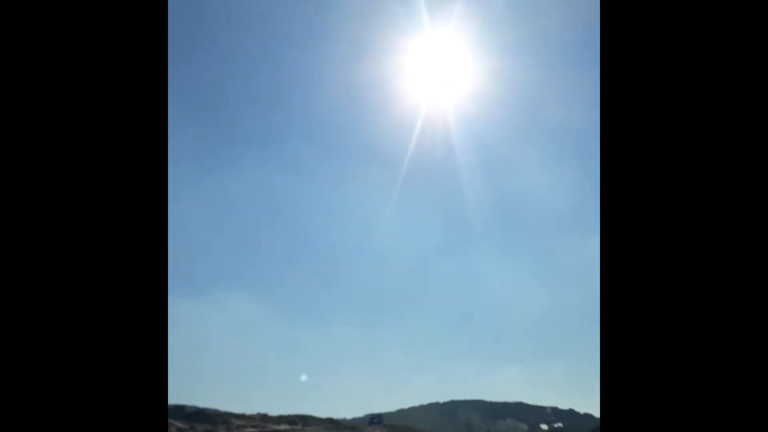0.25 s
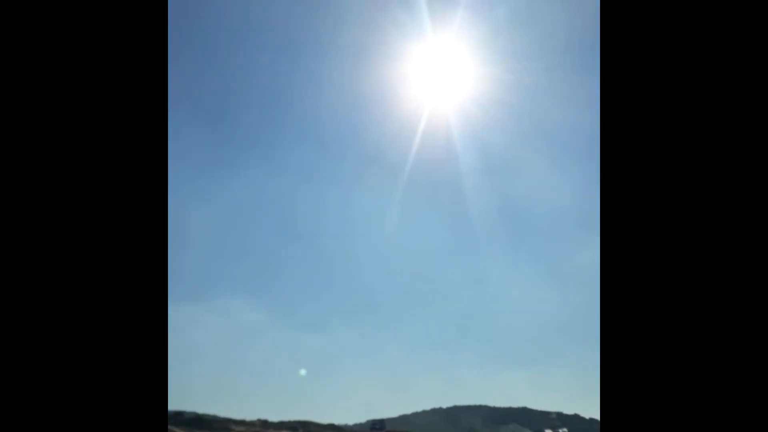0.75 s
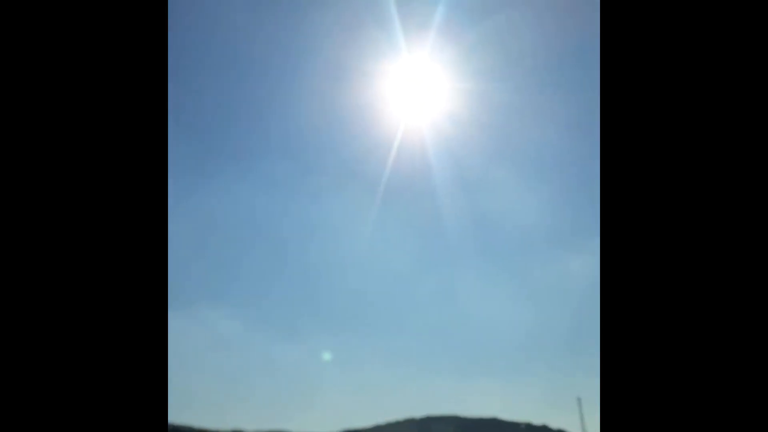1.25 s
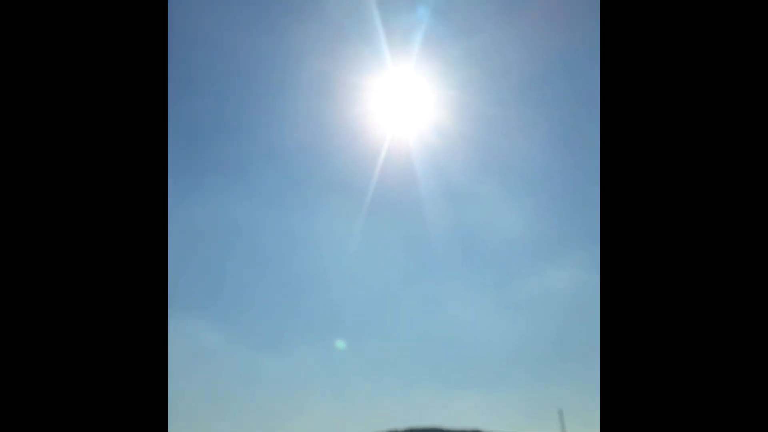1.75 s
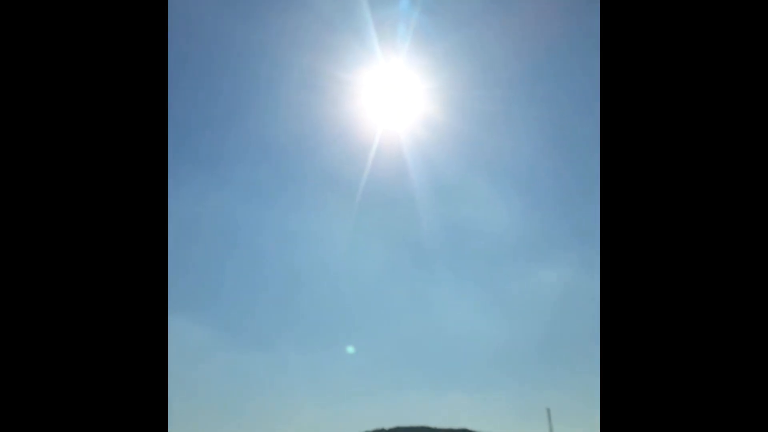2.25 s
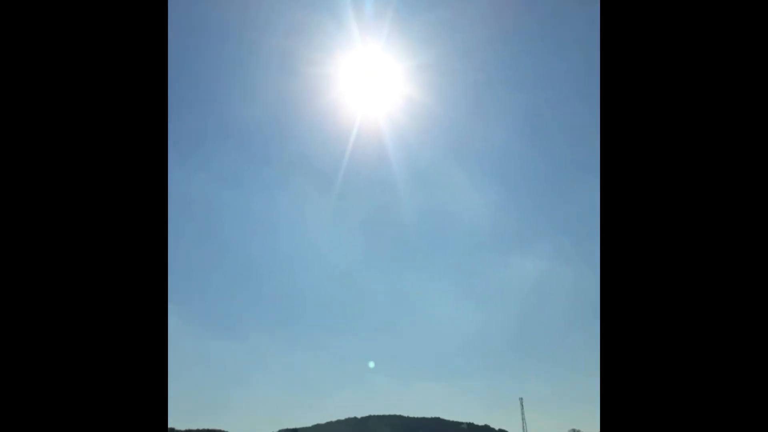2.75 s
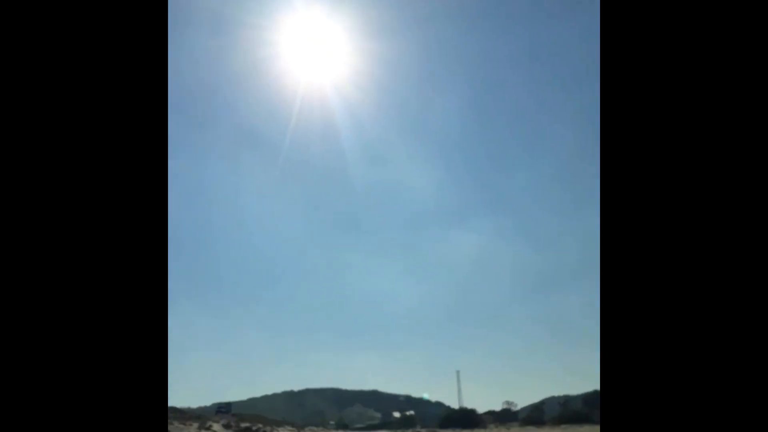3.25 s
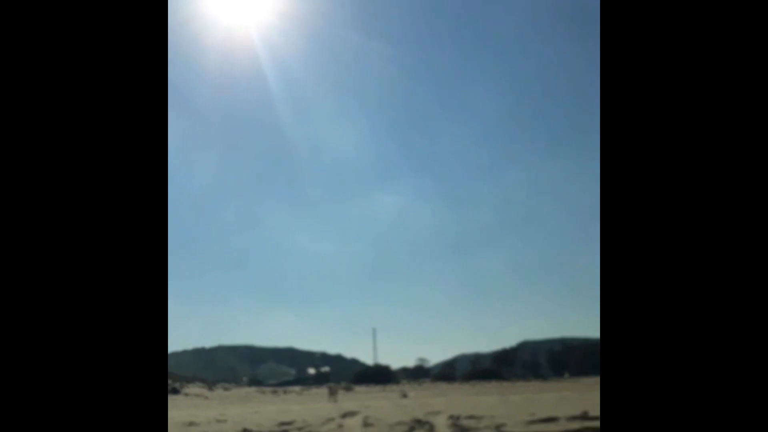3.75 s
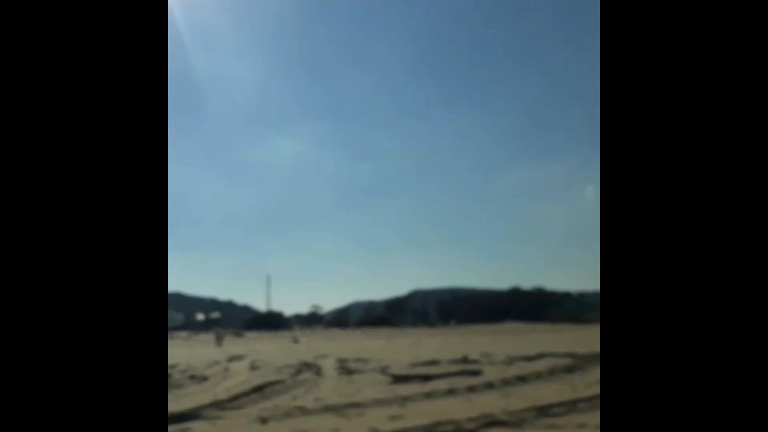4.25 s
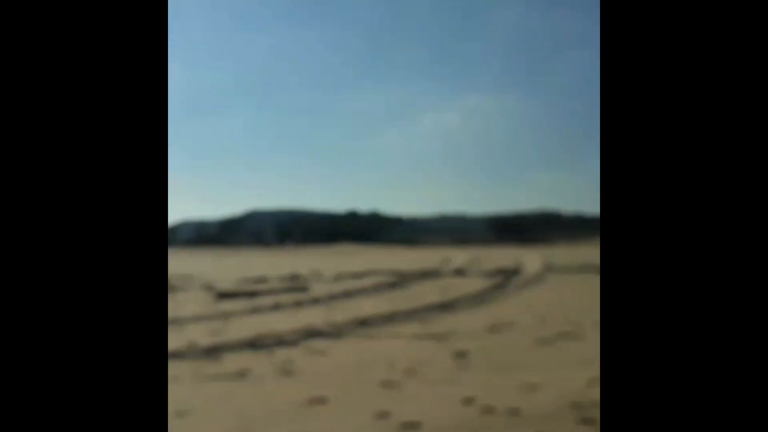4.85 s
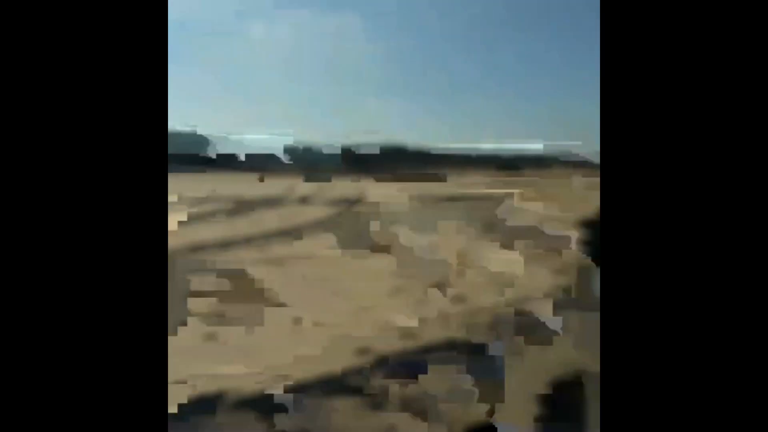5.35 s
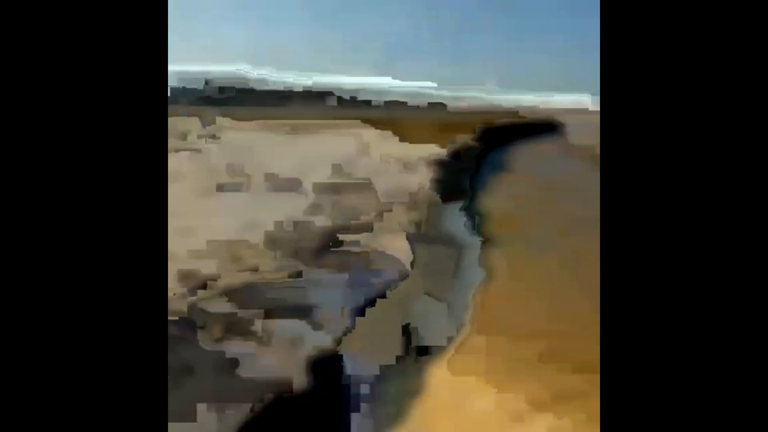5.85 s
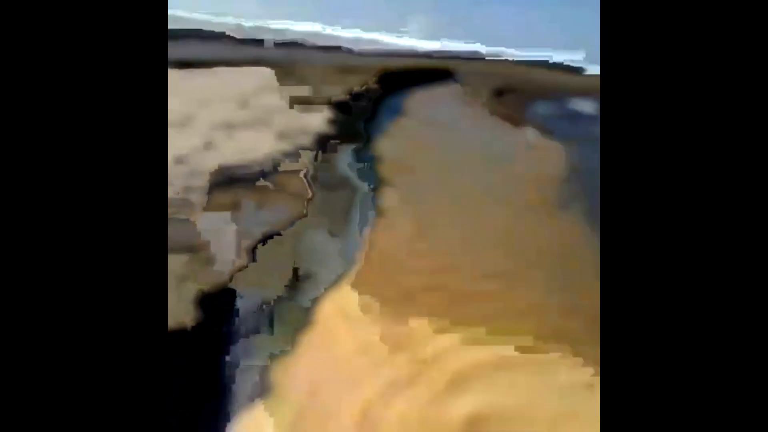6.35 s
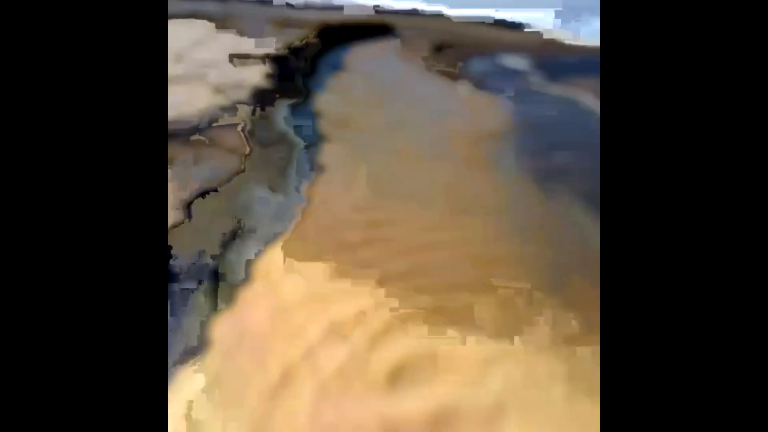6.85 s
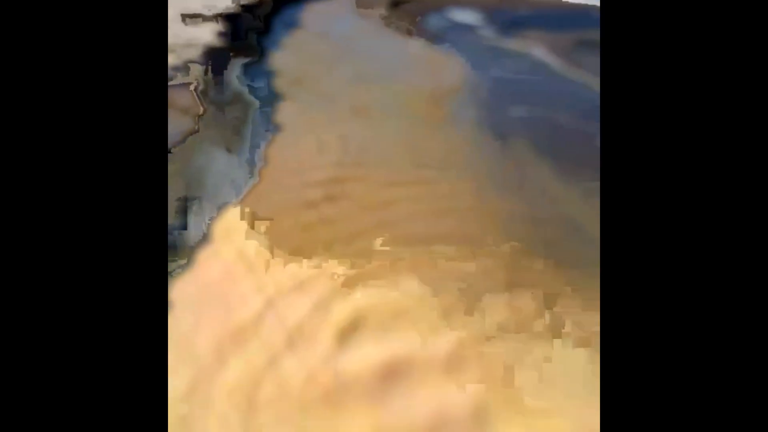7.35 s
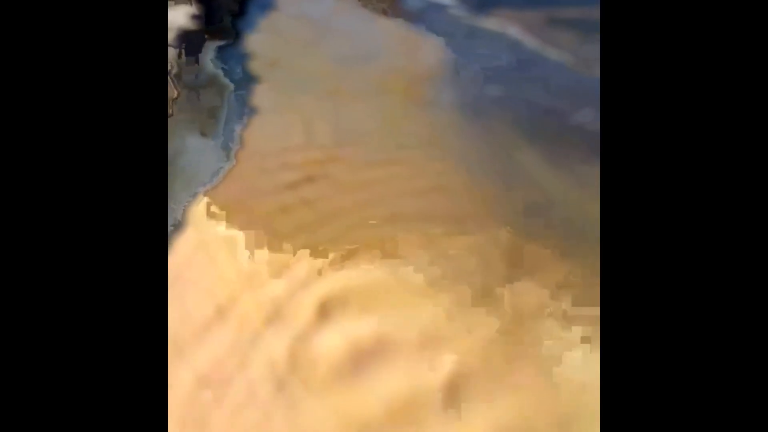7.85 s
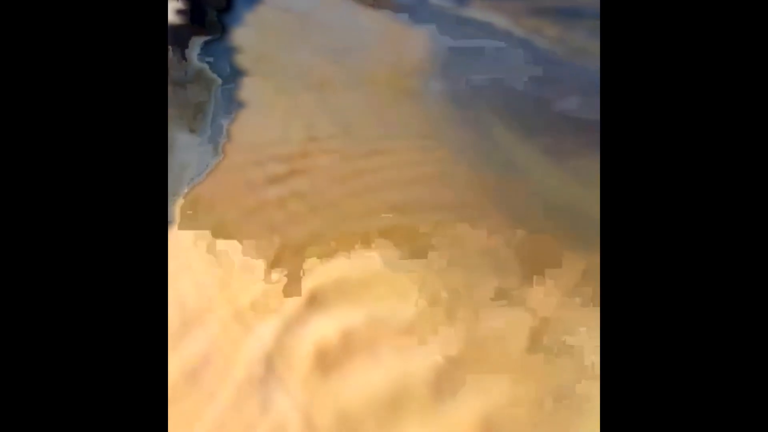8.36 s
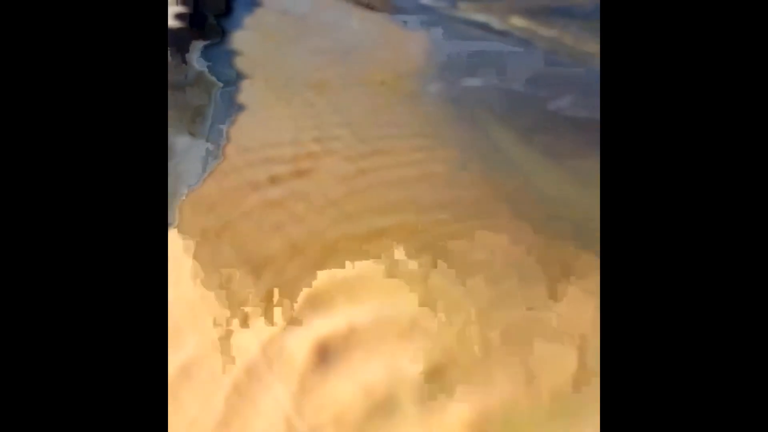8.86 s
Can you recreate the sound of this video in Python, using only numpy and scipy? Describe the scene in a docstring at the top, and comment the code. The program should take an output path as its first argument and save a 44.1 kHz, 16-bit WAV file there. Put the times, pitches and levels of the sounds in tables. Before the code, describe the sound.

On an open beach, waves make a continuous rushing wash while gusts rumble and flutter on the microphone. An early burst of wind eases into lighter puffs, with a few small, sharp clicks nearby. In the final seconds the wind comes back more persistently, and the quiet, hollow bubbling of a shallow stream comes in as the microphone nears it.

```python
"""Surf on a wide sandy beach

Surf breaks steadily, heard from a hand-held microphone that turns toward the water. Bubble clouds
roar, foam washes and fizzes, and a few small ticks snap and ring close by. Late on, a shallow stream
gurgles with hollow resonances and ringing bubbles. Gusts push eddies over the microphone and buffet
it: briefly near the start, harder and longer in the last third."""
import sys
import numpy as np
from scipy import signal
from scipy.fft import rfft, irfft, next_fast_len
from scipy.io import wavfile
from scipy.ndimage import uniform_filter1d

SR = 44100
rng = np.random.default_rng(int(sys.argv[2]) if len(sys.argv) > 2 else 0)


def generate_wav(sig):
    """Save sig (samples, or channels by samples) to the path in sys.argv[1] as 16-bit PCM at SR."""
    pcm = np.round(np.clip(np.atleast_2d(sig).T, -1, 1) * 32767).astype(np.int16)
    wavfile.write(sys.argv[1], SR, pcm)


N = 402191

# EQ curves for roar, wash, foam, tick snap and recorder hiss. Each row: frequency in Hz, gain in dB.
ROAR_EQ = [(30, -15), (100, -0.5), (190, -2.5), (275, -1.5), (350, -0.5), (450, -3.5), (560, -3.5),
           (700, -7.5), (1000, -14), (2000, -44.5), (3500, -57.5)]
WASH_EQ = [(100, 2), (250, -1.5), (550, -1), (900, 2), (1400, 0), (1900, -4), (2450, -3.5), (2880, -8.5),
           (3150, -18), (3400, -25), (3700, -25.5), (3950, -37.5), (5000, -48.5)]
FOAM_EQ = [(3500, -26), (4050, -9.5), (4450, -3), (5000, -1.5), (5600, 1), (6100, -3), (6700, -9.5),
           (8300, -12)]
SNAP_EQ = [(800, -5), (2800, 6), (3500, -8), (4200, -27.5), (8000, -28)]
HISS_EQ = [(2500, -2), (4000, -6), (5500, -4), (6800, 1.5), (8400, 3)]

# The surf's treble, falling as the microphone turns down to the shallows.
# Each row: time in seconds, gain in dB.
TREBLE_RIDE = [(0, 1.5), (1.2, -0.5), (2.2, 2.1), (3.15, 2.5), (3.5, 0.9), (4.55, 3), (5.4, -1), (7.0, -4),
               (7.6, -5), (9.12, -6.5)]
# Breakers swelling out of the steady surf.
# Each row: crest time in seconds, length in seconds, roar lift in dB, wash lift in dB.
BREAKERS = [(0.653, 1.8, 2, -0.2), (1.553, 1.85, 2, 3), (2.3, 1.24, 1.5, 2), (3.2, 1.9, 0.5, 1.5),
            (4.2, 1.3, -1.5, 2.5), (5.352, 2.8, -0.5, 3.8), (6.848, 1.94, 3, 3), (7.852, 1, 2.7, 0),
            (8.747, 2, 0.5, 2.5)]
# Brief surges of tumbling water. Each row: peak time in seconds, length in seconds, rush lift in dB.
SURGES = [(1.35, 0.5, 2.5), (2.72, .2, 3), (3.12, 0.3, 4), (6.06, .15, 3.5), (6.55, .5, 0.5),
          (8.68, .2, 5.5)]
# Flares of fizz. Each row: peak time in seconds, length in seconds, foam lift in dB.
FIZZ_FLARES = [(.28, .12, 2.5), (0.577, .06, 4), (0.67, 0.12, 4), (4.46, 0.15, 1)]
ROAR_DB, RUSH_DB, WASH_DB, FOAM_DB = -36.5, -41, -39, -63  # base levels, before the lifts
RUSH_FOLLOW, WASH_FOLLOW = 0.88, 0.44  # dB per dB of the treble ride
FOAM_FOLLOW = 0.27  # dB per dB of the breakers' wash lift

# The wind's steady push on the microphone. Each row: time in seconds, level in dB.
BREEZE = [(0, -40), (.6, -40), (.7, -31), (.97, -33), (1.08, -40), (1.4, -37.5), (2.25, -42.5),
          (2.7, -34.5), (3.3, -39.5), (3.85, -34.5), (4.05, -47), (5.2, -44.5), (5.65, -36.5),
          (5.97, -29.5), (6.1, -29), (6.55, -30), (6.7, -36), (7.4, -38), (7.9, -34), (8.5, -34),
          (9.12, -29.5)]
# Gusts on top of it. Each row: peak time in seconds, peak level in dB, length in seconds.
GUSTS = [(0.07, -30, 0.12), (0.369, -28, 0.12), (.5, -30, .06), (0.673, -23.5, 0.04), (0.707, -17.5, 0.053),
         (.745, -27, .07), (0.832, -24, 0.075), (0.928, -24, 0.056), (0.972, -19.5, 0.048),
         (1.344, -29, 0.18), (2.555, -31.5, 0.14), (2.68, -27.2, 0.18), (2.977, -29, 0.07),
         (3.523, -27.5, 0.22), (5.89, -30.5, 0.19), (6.05, -23, 0.057), (6.125, -26, .08),
         (6.2, -26.5, .08), (6.282, -26, 0.11), (6.358, -25, .06), (6.417, -24, .06), (6.47, -24, .04),
         (6.527, -18.5, 0.065), (6.587, -22.5, 0.068), (6.635, -29, .07), (6.811, -28.5, 0.074),
         (6.899, -23.5, 0.21), (7.01, -23, .07), (7.106, -26.5, 0.076), (7.216, -27.5, 0.088),
         (7.294, -33, 0.053), (7.603, -27, 0.085), (8.04, -26, 0.092), (8.13, -24, 0.082),
         (8.459, -28, 0.054), (8.623, -27.5, 0.16), (8.833, -30.5, 0.18), (9.049, -29.5, 0.27)]
# How fast eddies pass the microphone port. Each row: time in seconds, rate in Hz.
EDDY_RATE = [(0, 42.9), (5.3, 44.14), (5.9, 52.07), (6.2, 64.9), (6.34, 65.05), (6.45, 48.2), (6.8, 38.14),
             (8.0, 39), (9.12, 44.02)]
FLUTTER_GROWTH, SPUTTER_GROWTH = 1.042, 1.74  # dB per dB of wind
FLUTTER_TRIM_DB, SPUTTER_TRIM_DB = -9, -6
FLUTTER_DB_PER_HZ = 0.08  # more flutter as the eddies pass faster than usual

# Small close ticks. Each row: start in seconds, ring gain in dB, ring pitch in Hz,
# seconds for the ring to fall 60 dB, snap gain in dB.
TICKS = [(.096, -46, 5600, .016, -55), (.769, -28.5, 2620, .011, -41), (.791, -34, 3500, .007, -37),
         (.874, -46, 4900, .006, -52), (1.01, -27.5, 2700, .010, -39), (1.631, -15.2, 2740, .015, -33),
         (2.020, -44, 6300, .014, -50), (3.096, -43, 5400, .01, -48), (3.273, -46, 5500, .01, -46),
         (3.665, -45, 5200, .01, -40), (4.445, -41, 6000, .01, -35), (4.672, -46, 4500, .01, -36),
         (5.620, -25, 2490, 0.011, -47), (7.918, -34, 5300, .0038, -42), (8.286, -29, 2180, .022, -47),
         (8.617, -39, 6000, .0068, -42)]
# The modes a tick rings with. Each row: multiple of the ring pitch, gain in dB.
TICK_MODES = [(.61, -12), (.9, -7), (1, 1)]
TICK_ATTACK_S, SNAP_T60_S = 0.00064, 0.015
TICK_CUTOFF_RATIO = 1.05  # low-pass corner over ring pitch

# The stream as the microphone nears it. Each row: time in seconds, gain in dB, hollow note in Hz.
STREAM_APPROACH = [(0, -74.5, 247), (5.3, -60.5, 244.3), (6.3, -52, 245.4), (7.1, -42, 239.8),
                   (7.6, -43, 278.2), (8.1, -42.5, 280.2), (8.5, -45.5, 268), (9.12, -44, 274.8)]
# Its hollow resonances. Each row: multiple of the note, width in Hz, gain in dB.
HOLLOW_MODES = [(1, 65.1, 0.5), (2.13, 69.75, -3.5), (2.95, 100, -4.5)]
BUBBLES_PER_S, GURGLE_TRIM_DB, BUBBLE_SPREAD_DB = 40, -2.5, 10
BUBBLE_LOW_HZ, BUBBLE_HIGH_HZ, BUBBLE_ONSET_CYCLES = 259.2, 848, 2
BUBBLE_CYCLES, BUBBLE_GLIDE = 42, .2  # cycles to fall 60 dB; share by which the pitch rises meanwhile

HISS_DB, HIGH_TONE_DB = -62.5, -93
TREBLE_EDGE_HZ, HIGH_TONE_HZ, TOP_HZ = 8400, 11025, 12000


def undb(db):
    """Decibels to gain."""
    return 10 ** (np.asarray(db) / 20)


def unit(x):
    """Scale to rms 1."""
    return x / np.sqrt(np.mean(x ** 2))


def curves(table):
    """Turn rows of a time and its values into automation curves, one value a sample."""
    times, *columns = np.transpose(table)
    return [np.interp(np.arange(N) / SR, times, column) for column in columns]


def equalise(x, points):
    """Shape a sound with an EQ curve and scale it to rms 1."""
    hz, db = np.transpose(points)
    f = np.maximum(np.fft.rfftfreq(N, 1 / SR), 1)
    gain = undb(np.interp(np.log(f), np.log(hz), db))
    return unit(irfft(rfft(x) * gain, N))


def band(x, low_hz, high_hz, order):
    """Band-pass with smooth skirts."""
    size = next_fast_len(N)
    f = np.maximum(np.fft.rfftfreq(size, 1 / SR), 1)
    loss = np.sqrt((1 + (low_hz / f) ** (2 * order)) * (1 + (f / high_hz) ** (2 * order)))
    return irfft(rfft(x, size) / loss, size)[:N]


def wander(per_s):
    """Smooth random modulation at rms 1, heading for a new value per_s times a second."""
    hold = int(SR / per_s)
    steps = np.repeat(rng.standard_normal(N // hold + 1), hold)
    return unit(uniform_filter1d(uniform_filter1d(steps, hold), hold)[:N])


def swell(crest_s, length_s, attack_share=0.53):
    """A smooth rise from 0 to 1 at the crest and a smooth fall back."""
    position = (np.arange(N) / SR - crest_s) / length_s
    return np.sin(np.pi / 2 * np.interp(position, [-attack_share, 0, 1 - attack_share], [0, 1, 0]))


def narrow_noise(hz, width_hz):
    """Narrow complex noise around a moving centre; its real part has rms 1."""
    carrier = np.exp(2j * np.pi * np.cumsum(hz) / SR)
    return (wander(2 * width_hz) + 1j * wander(2 * width_hz)) * carrier


def churn(swell_db, flicker_db):
    """Bubble clouds of many sizes: each octave swells slowly and flickers on its own."""
    out = 0
    for hz in 2. ** np.arange(5, 13):
        cloud = band(rng.standard_normal(N), hz, 2 * hz, order=6)
        out = out + cloud * undb(swell_db * wander(4) + flicker_db * wander(24))
    return unit(out)


def pops(per_s, spread_db):
    """Bursting bubbles: random clicks, many small and a few large."""
    size = undb(spread_db * np.minimum(rng.exponential(size=N), 5))
    return unit((rng.random(N) < per_s / SR) * size * rng.choice([-1, 1], N))


def surf():
    """Breakers roar low, tumbling water rushes and washes above them, and foam fizzes on top."""
    treble_db, = curves(TREBLE_RIDE)
    roar_lift, wash_lift = sum(np.outer(lifts, swell(s, length) ** 2) for s, length, *lifts in BREAKERS)
    roar = equalise(churn(swell_db=0.82, flicker_db=0.14), ROAR_EQ) * undb(ROAR_DB + roar_lift)

    surge_db = sum(db * swell(s, length) for s, length, db in SURGES)
    tumble = unit(band(churn(swell_db=0.6, flicker_db=1.0), low_hz=730, high_hz=890, order=4))
    rush = tumble * undb(RUSH_DB + RUSH_FOLLOW * treble_db + surge_db)

    splash = wander(12)  # small splashes lift the wash and the foam together
    bubbles = churn(swell_db=1.23, flicker_db=0.6) + undb(-6.5) * pops(per_s=1200, spread_db=2.0)
    wash_db = WASH_DB + WASH_FOLLOW * treble_db + wash_lift + 0.38 * splash
    wash = equalise(bubbles, WASH_EQ) * undb(wash_db)

    fizz = rng.standard_normal(N) + undb(-3.5) * pops(per_s=830, spread_db=4.5)
    flare_db = sum(db * swell(s, length, attack_share=.4) for s, length, db in FIZZ_FLARES)
    foam_db = FOAM_DB + treble_db + flare_db + FOAM_FOLLOW * wash_lift + 0.25 * splash + 0.66 * wander(40)
    foam = equalise(fizz, FOAM_EQ) * undb(foam_db)
    return roar + rush + wash + foam


def wind_level():
    """Level in dB of the wind: a turbulent breeze with gusts on top."""
    breeze_db, = curves(BREEZE)
    turbulence_db = 2.5 * wander(18)
    power = undb(breeze_db + turbulence_db) ** 2
    for s, db, length in GUSTS:
        power += (undb(db) * swell(s, length, attack_share=0.46)) ** 2
    return 10 * np.log10(power)


def wind():
    """Eddies buffet the microphone port; strong gusts shed smaller ones that flutter, then sputter."""
    wind_db = wind_level()
    eddy_hz, = curves(EDDY_RATE)
    eddies = narrow_noise(eddy_hz, width_hz=44)
    # Level the eddies out, so the wind sets their strength and only their shapes are random.
    strength = np.sqrt(uniform_filter1d(np.abs(eddies) ** 2, size=1900))
    buffet = unit(band(eddies.real / strength, low_hz=26.6, high_hz=150, order=3))
    flutter = unit(band(rng.standard_normal(N), low_hz=88, high_hz=138, order=3))
    sputter = unit(band(rng.standard_normal(N), low_hz=160, high_hz=282, order=3))
    flutter_db = FLUTTER_TRIM_DB + FLUTTER_GROWTH * wind_db
    flutter_db += FLUTTER_DB_PER_HZ * (eddy_hz - np.mean(eddy_hz))
    sputter_db = SPUTTER_TRIM_DB + SPUTTER_GROWTH * wind_db
    return buffet * undb(wind_db) + flutter * undb(flutter_db) + sputter * undb(sputter_db)


def ticks():
    """A broad snap and a few damped modes; the soft contact rounds the attack and dulls the top."""
    out, t = np.zeros(N), np.arange(SR // 20) / SR
    snap_noise = equalise(rng.standard_normal(N), SNAP_EQ)
    attack = 1 - np.exp(-(t / TICK_ATTACK_S) ** 2)
    for s, ring_db, hz, t60, snap_db in TICKS:
        i = int(s * SR)
        modes = sum(undb(db) * np.sin(2 * np.pi * ratio * hz * t) for ratio, db in TICK_MODES)
        ring = modes * attack * undb(-60 * t / t60)
        snap = snap_noise[i:i + len(t)] * undb(-60 * t / SNAP_T60_S)
        low_pass = signal.butter(8, TICK_CUTOFF_RATIO * hz, fs=SR, output="sos")
        out[i:i + len(t)] += signal.sosfilt(low_pass, undb(ring_db) * ring + undb(snap_db) * snap)
    return out


def gurgle():
    """Single bubbles ring at random, each gliding upward as it dies away."""
    out, t = np.zeros(N + SR), np.arange(SR // 5) / SR
    for when, pitch, loudness in rng.random((int(BUBBLES_PER_S * N / SR), 3)):
        hz = BUBBLE_LOW_HZ * (BUBBLE_HIGH_HZ / BUBBLE_LOW_HZ) ** pitch
        age = t * hz / BUBBLE_CYCLES
        chirp = np.sin(2 * np.pi * hz * t * (1 + BUBBLE_GLIDE * age / 2))
        envelope = (1 - np.exp(-t * hz / BUBBLE_ONSET_CYCLES)) * undb(-60 * age)
        i = int(when * N)
        out[i:i + len(t)] += undb(BUBBLE_SPREAD_DB * loudness) * chirp * envelope
    return unit(out[:N])


def stream():
    """The shallow stream comes near: hollow resonances drift under its gurgle."""
    approach_db, note_hz = curves(STREAM_APPROACH)
    hollow = sum(undb(db) * narrow_noise(ratio * note_hz, width).real
                 for ratio, width, db in HOLLOW_MODES)
    return undb(approach_db) * (hollow + undb(GURGLE_TRIM_DB) * gurgle())


def scene():
    """Surf, wind, ticks and stream, mixed in mono."""
    return (surf() + wind() + ticks() + stream())[None]


def record(dry):
    """The recorder adds a faint hiss, dulls the treble and cuts the top."""
    hiss = undb(HISS_DB) * equalise(rng.standard_normal(N), HISS_EQ)
    # A very faint steady high tone sits above the dulled treble.
    high_tone = undb(HIGH_TONE_DB) * np.sqrt(2) * np.sin(2 * np.pi * HIGH_TONE_HZ * np.arange(N) / SR)
    treble_cut = signal.ellip(12, .2, 70, TREBLE_EDGE_HZ, fs=SR, output="sos")
    top_cut = signal.ellip(8, .2, 70, TOP_HZ, fs=SR, output="sos")
    dulled = signal.sosfilt(treble_cut, dry + hiss)
    return signal.sosfilt(top_cut, dulled + high_tone)


dry = scene()
out = record(dry)
generate_wav(out)
```